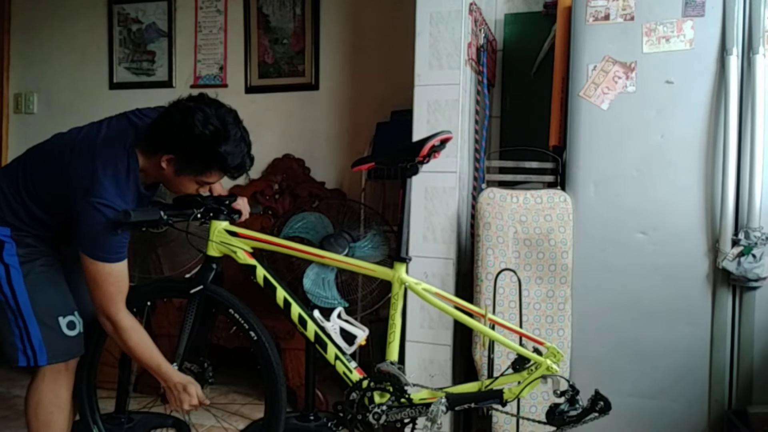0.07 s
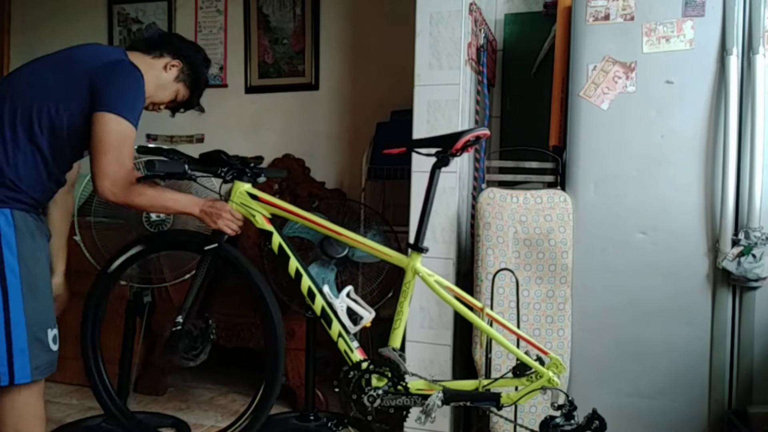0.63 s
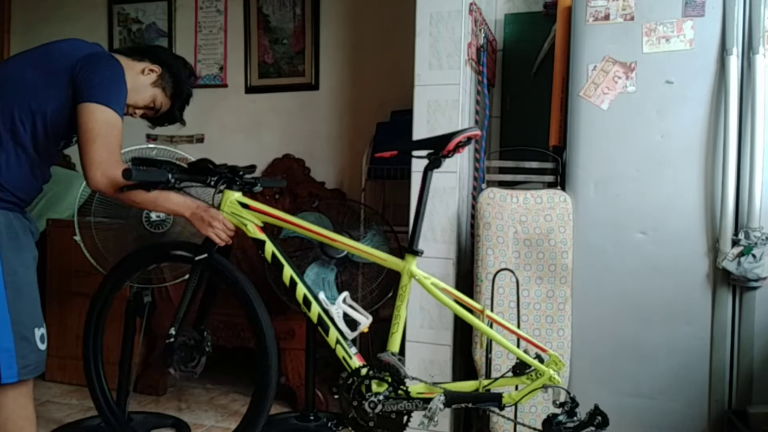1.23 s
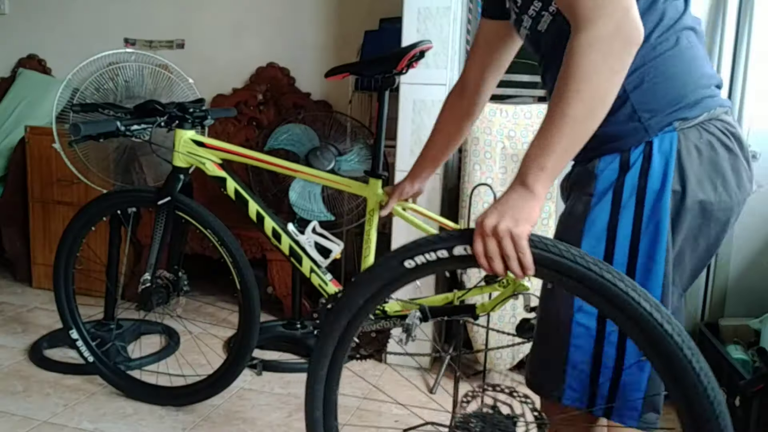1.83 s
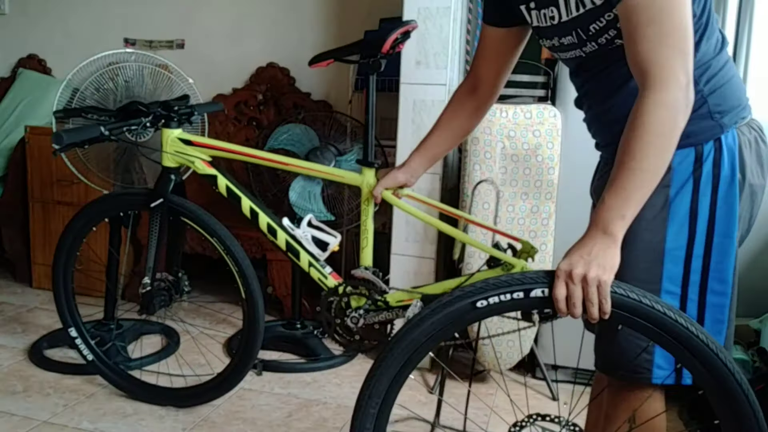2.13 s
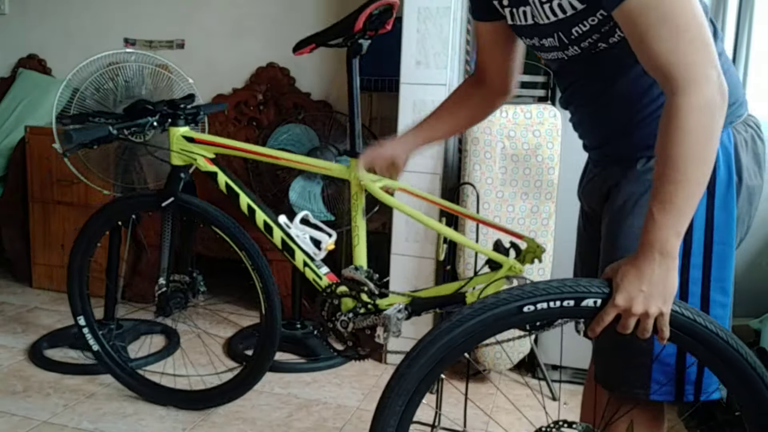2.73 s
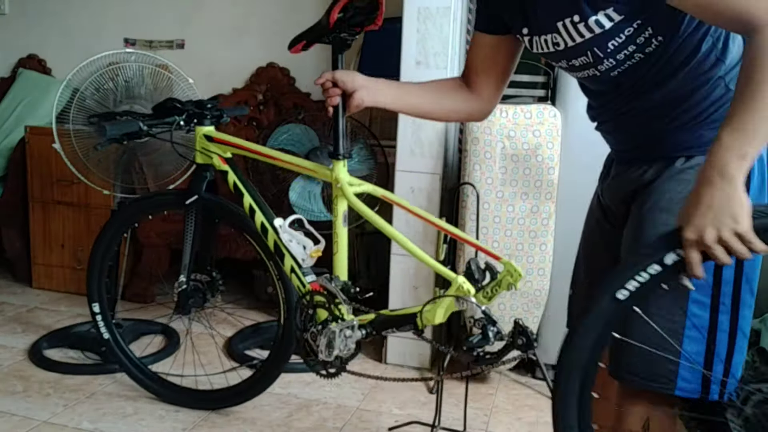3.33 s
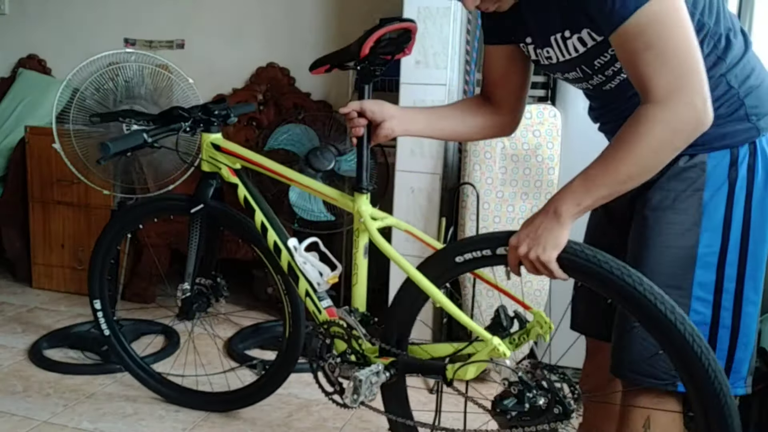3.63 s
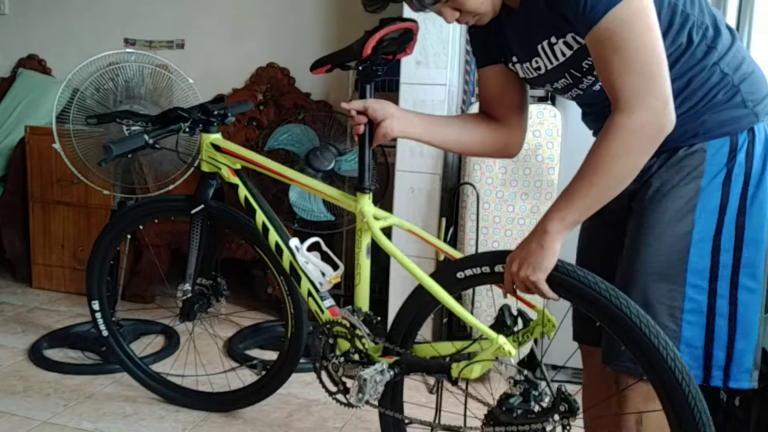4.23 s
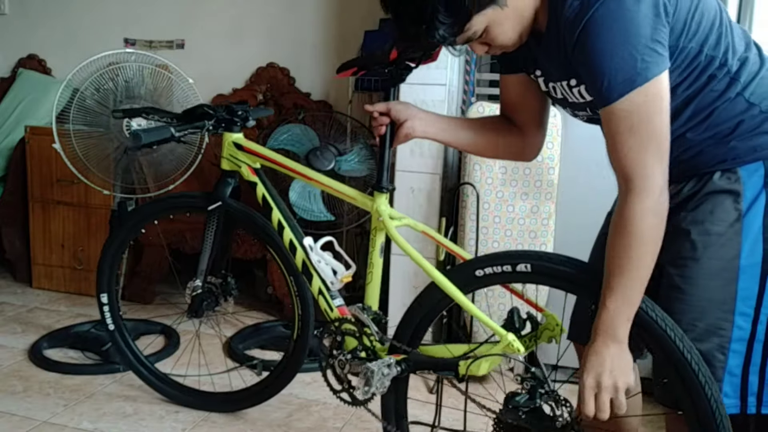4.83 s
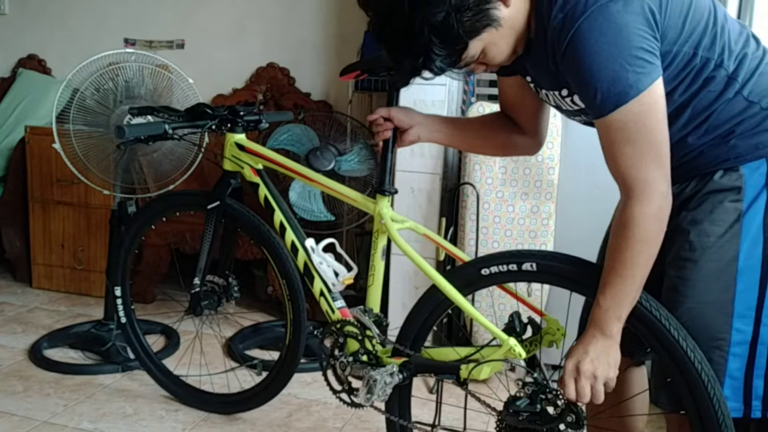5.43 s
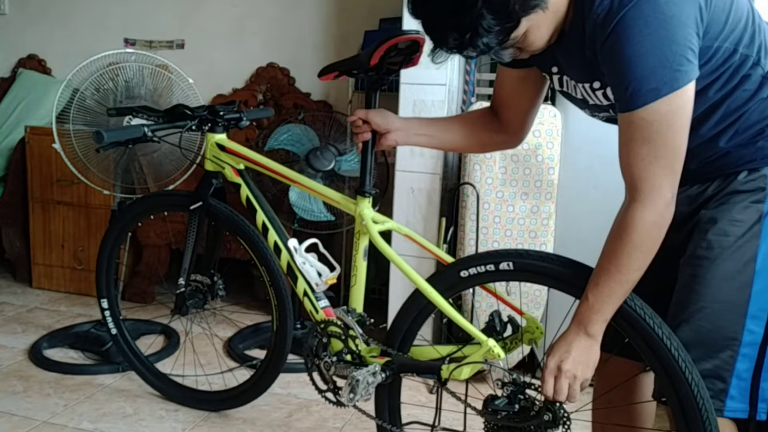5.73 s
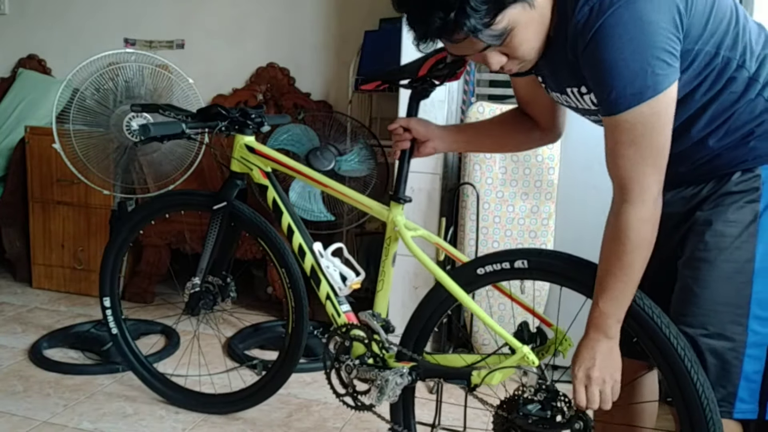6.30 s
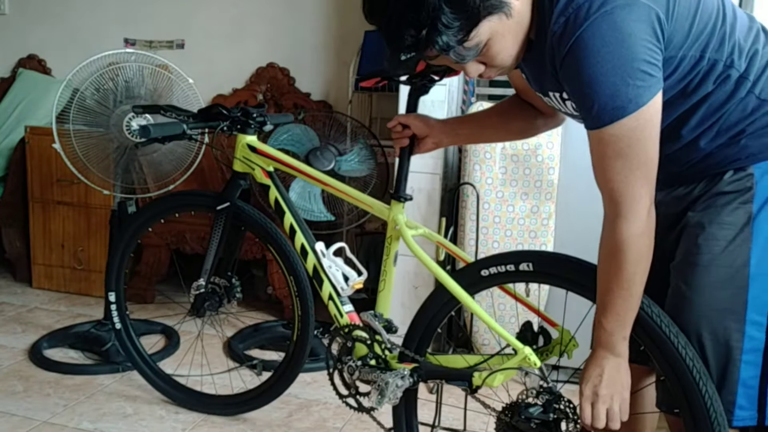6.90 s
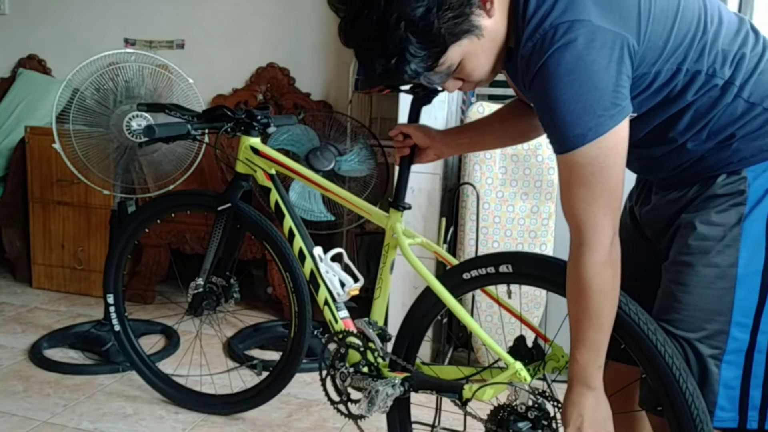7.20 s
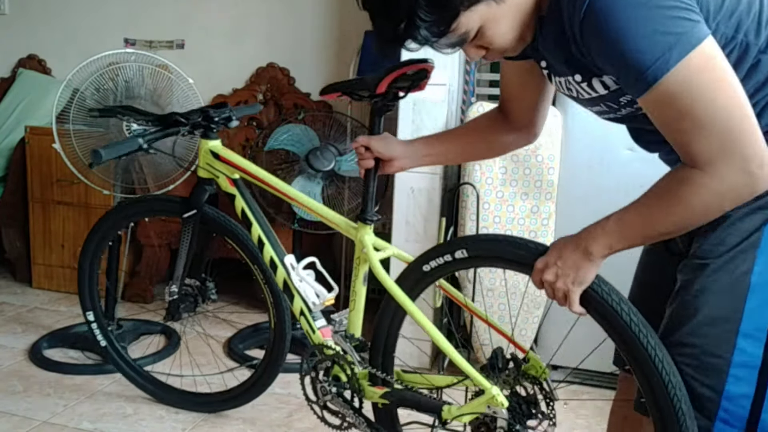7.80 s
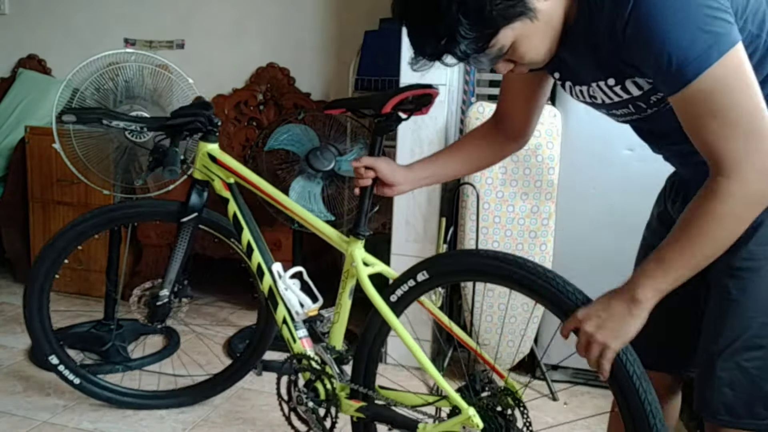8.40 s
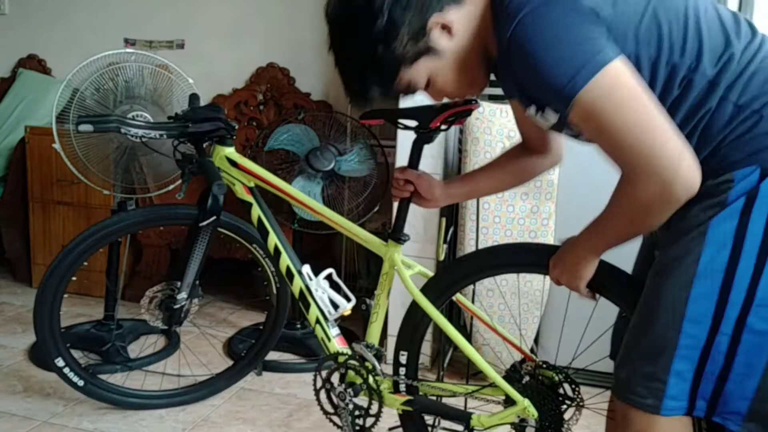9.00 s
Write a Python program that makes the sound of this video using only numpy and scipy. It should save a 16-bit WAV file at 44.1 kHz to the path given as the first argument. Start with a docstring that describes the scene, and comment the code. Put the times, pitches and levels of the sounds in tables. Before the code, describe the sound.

A bicycle is handled nearby in a small room, over a faint steady hiss with soft rustles of hands and clothes. Light taps on the frame and tiny chain ticks fill the first half second, followed by a metal clink at 0.7. A quick cluster of sharp knocks comes at 1.4, and the whole sound dips briefly near 1.7. From about 2.1 to 2.3 the chain and gears clatter loudly against the frame, with low floor bumps. A sharp metallic click at 3.6 trails into small clinks and a faint rattle. Quiet clinks and ticks follow around 4.9 to 5.2. The wheel knocks into the frame at 5.9 and again, with a short ring, at 7.4, amid soft floor bumps. Light clinks, taps and a bright chain tick gather around 8, then a faint chain rattle runs on to about 9.

```python
"""Knocks and a clatter of chain and derailleur: a mountain bike is handled in a small tiled room.
The front wheel is clamped, the frame is lifted and the rear wheel is worked into the dropouts.
Blows ring the frame's modes, chain links tick and rattle, tyre and feet bump on the floor, hands and
clothes rustle. A faint steady hiss lies under it all; the whole sound dips briefly once."""
import sys
import numpy as np
from scipy import signal
from scipy.fft import rfft, irfft
from scipy.io import wavfile

SR = 44100
rng = np.random.default_rng(int(sys.argv[2]) if len(sys.argv) > 2 else 0)


def dump(signal):
    """Clip the signal to [-1, 1] and save it as 16-bit WAV at the path in sys.argv[1]."""
    limited = np.clip(np.atleast_2d(signal).T, -1, 1)
    pcm = np.round(limited * 32767).astype(np.int16)
    wavfile.write(sys.argv[1], SR, pcm)


N = 403515
T = np.arange(SR // 3) / SR  # seconds since a blow


def undb(db):
    """Decibels to gain."""
    return 10 ** (np.asarray(db) / 20)


def unit(x):
    """Scale to rms 1."""
    return x / np.sqrt(np.mean(x ** 2))


def add(out, start_s, x):
    """Mix x in at start_s."""
    i = int(start_s * SR)
    out[i:i + len(x)] += x[:N - i]


def walk(rate_hz, size=N):
    """Random levels joined by straight lines, spread near 1."""
    levels = rng.standard_normal(size // 16)
    return np.interp(np.arange(size) * rate_hz / SR, np.arange(len(levels)), levels)


def fade(t60_s):
    """Free decay after a blow; a t60 of zero or less leaves an impulse."""
    return np.exp(-np.log(1000) * T / max(t60_s, 1 / SR))


def swell(rise_s):
    """Linear rise as parts come into full contact."""
    return np.minimum(T / max(rise_s, 1 / SR), 1)


def ring(hz, t60_s):
    """One struck mode."""
    return np.sqrt(2) * np.sin(2 * np.pi * hz * T) * fade(t60_s)


def db_at(points, hz):
    """Read a spectrum on a log-frequency axis."""
    f, db = np.transpose(points)
    return np.interp(np.log(hz + 1), np.log(f), db)


def hump(f, hz, width_hz):
    """Bell around hz, height 1."""
    return 1 / (1 + (2 * (f - hz) / width_hz) ** 2)


def treble(f, corner_hz=4200):
    """Shelf from 0 to 1 over the range that only hard contacts reach."""
    return 1 - 1 / (1 + (f / corner_hz) ** 4)


def colour(x, db_of_hz, size=2048):
    """Minimum-phase filter of unit energy, shaped by the given dB curve."""
    hz = np.arange(size // 2 + 1) * SR / size
    cepstrum = irfft(np.log(undb(db_of_hz(hz))))
    cepstrum[1:size // 2] *= 2
    cepstrum[size // 2 + 1:] = 0
    response = irfft(np.exp(rfft(cepstrum)))
    return signal.fftconvolve(x, response / np.linalg.norm(response))[:len(x)]


def burst(db_of_hz, t60_s, crack, grit_db):
    """A first crack and a dying chatter of micro-contacts drive a crowd of modes."""
    chatter = rng.standard_normal(len(T)) * undb(grit_db * walk(871, size=len(T)))
    push = unit(chatter) * fade(t60_s)
    push[0] += crack
    body = colour(push, db_of_hz)
    return body * np.linalg.norm(fade(t60_s)) / np.linalg.norm(body)


# Room hiss. Each row: frequency in Hz, relative density in dB.
HISS_SPECTRUM = [(15, -59), (25, -7), (53, -21.5), (96, -7.5), (204, -7.5), (240, -13.5), (359, -6),
                 (410, -7), (666, -3.5), (804, -4), (1490, -4), (2630, -9), (5580, -29), (8810, -31.5),
                 (15500, -40.5)]
# Humps in the hiss. Each row: centre in Hz, width in Hz, height in dB.
HISS_HUMPS = [(682, 42, 3), (7450, 110, 5), (8720, 1420, 11)]


def hiss(swish, level_db=-48, drift_db=1.6, flutter_db=0.33):
    """Steady room hiss that wavers a little; the swish of clothes adds to it."""
    def spectrum(f):
        return db_at(HISS_SPECTRUM, f) + sum(db * hump(f, hz, width) for hz, width, db in HISS_HUMPS)
    air = colour(rng.standard_normal(N), spectrum)
    steady = undb(level_db + drift_db * walk(1.65))
    return air * np.hypot(steady, swish) * undb(flutter_db * walk(14))


# Reaching, gripping, shifting the bike. Each row: start in seconds, length in seconds,
# swish in dB, floor rumble in dB.
MOVES = [(0, 0.48, -46.5, -60.5), (0.272, 0.33, -48, -66), (0.39, 1, -48.5, -58.5),
         (0.51, 0.28, -46.5, -66), (1.124, 0.6, -43.5, -50.5), (1.743, 0.15, -52, -72),
         (1.94, 0.41, -47.5, -58), (4.8, 0.7, -49.5, -67), (5.988, 0.14, -49, -60),
         (6.097, 0.74, -55.5, -81), (6.815, 0.34, -50.5, -57.5), (7.35, 1, -52, -61),
         (7.807, 0.062, -46, -66), (8.03, 0.43, -50, -75), (8.515, 0.51, -52, -70)]


def move_gains(slip_db=-0.5, slip_db_per_s=-10.5):
    """Each move is one arch of swish, slip and weight; brisk ones scrape, long ones mostly swish."""
    swish, slip, weight = np.zeros((3, N))
    for start_s, length_s, db, floor_db in MOVES:
        arch = np.hanning(int(length_s * SR))
        add(swish, start_s, arch * undb(db) ** 2)
        add(slip, start_s, arch * undb(db + slip_db + slip_db_per_s * length_s) ** 2)
        add(weight, start_s, arch * undb(floor_db) ** 2)
    return np.sqrt([swish, slip, weight])


def floor_rumble(weight, hz=115, width_hz=80):
    """Shifting weight and the rocking bike rumble in the floor."""
    low = colour(rng.standard_normal(N), lambda f: 20 * np.log10(hump(f, hz, width_hz) + 1e-5))
    return low * weight * undb(walk(6.6))


# Sliding hands and clothes. Each row: frequency in Hz, relative density in dB.
RUSTLE_SPECTRUM = [(600, 14.5), (2000, 2), (4000, 3), (6300, -16), (8800, 1), (11000, -9), (15500, -33)]


def rustles(slip):
    """Sliding contacts, made of tiny uneven slips."""
    unevenness_db = 5.5 * walk(400) + 4.5 * walk(30)
    slips = unit(rng.standard_normal(N) * undb(unevenness_db))
    return colour(slips * slip, lambda f: db_at(RUSTLE_SPECTRUM, f))


# Soft floor contacts. Each row: start in seconds, relative level in dB, pitch in Hz.
FLOOR_BUMPS = [(1.45, -49, 99), (2.125, -43, 96), (2.254, -46, 122), (2.285, -44, 86.5), (2.802, -53, 89),
               (3.56, -57, 81), (5.775, -49, 70), (6.003, -46.5, 100), (7.001, -52, 105), (7.289, -51, 80),
               (7.441, -47, 105), (7.821, -57, 84)]


def floor_bumps(rise_s=0.0042, t60_s=0.101):
    """Tyre and feet meet the floor softly: a few low cycles."""
    out = np.zeros(N)
    onset = 1 - np.exp(-T / rise_s)
    for start_s, db, hz in FLOOR_BUMPS:
        add(out, start_s, 2 * undb(db) * ring(hz, t60_s) * onset)
    return out


# Lasting frame modes. Each row: frequency in Hz, level in dB, t60 in seconds before damping.
FRAME_MODES = [(370, -26, 0.095), (637, 1, 0.077), (1302, 5.5, 0.074), (1620, 3.5, 0.041), (1927, 0, 0.083),
               (2064, -2.5, 0.14), (2130, -7.5, 0.17), (2380, -16, 0.069), (2630, -20, 0.098),
               (3214, -26, .11), (4355, 1, 0.1), (5080, -16, 0.056), (6300, -32, 0.09), (8300, -28, 0.034),
               (9000, -30, .07)]


def frame_ring(damping_t60_s):
    """The place of the blow, drawn at random, sets how strongly each mode answers."""
    shares = rng.uniform(-1, 1, len(FRAME_MODES))
    modes = sum(share * undb(db) * ring(hz, t60_s) for share, (hz, db, t60_s) in zip(shares, FRAME_MODES))
    return modes * fade(damping_t60_s)


# Crowded modes of frame and wheel. Each row: frequency in Hz, relative density in dB.
FRAME_SPECTRUM = [(30, -39), (130, -39), (300, -37), (470, -8), (800, -6.5), (1250, -6), (1550, -4.5),
                  (2000, 1), (2600, -6.5), (3600, -15), (4500, -19), (6000, -23), (7600, -22.5),
                  (9000, -15.5), (11000, -30), (15500, -46)]


def frame_touch(t60_s, treble_db):
    """A light contact gives a dry rattle of the frame and a faint ring."""
    body = burst(lambda f: db_at(FRAME_SPECTRUM, f) + treble_db * treble(f), t60_s, crack=3.2, grit_db=1)
    return body + undb(-17) * frame_ring(4.1 * t60_s)


# Hands and lever on the frame. Each row: start in seconds, level in dB.
FRAME_TAPS = [(.097, -33.5), (.1305, -36), (.307, -32.5), (.377, -37.5), (0.568, -37.5), (.595, -36.5),
              (1.653, -31.5), (3.167, -40), (4.440, -41.5), (7.830, -44), (8.05, -37.5), (8.566, -45)]


def frame_taps(rise_s=0.0032, t60_s=0.097):
    """Damped touches: the frame answers, nothing pings."""
    out = np.zeros(N)
    for start_s, db in FRAME_TAPS:
        add(out, start_s, undb(db) * swell(rise_s) * frame_touch(t60_s, treble_db=1))
    return out


# Spokes and axle. Each row: start in seconds, level in dB, pitch in Hz, relative ping in dB.
METAL_CLINKS = [(0.69, -28.5, 2420, -1.5), (3.663, -39, 2110, 2), (3.673, -39, 2475, 6.5),
                (3.727, -39.5, 2430, 1), (4.867, -40.5, 2066, 0), (5.034, -38, 2024, 3),
                (5.035, -58, 4300, 7), (5.226, -42, 2200, -8), (6.877, -34, 2540, -7),
                (7.845, -35, 1695, -1), (8.183, -34, 1820, 1)]


def metal_clinks(rise_s=0.0022, t60_s=0.068):
    """Light metal touches: a short ping over a dry rattle of the frame."""
    out = np.zeros(N)
    for start_s, db, hz, ping_db in METAL_CLINKS:
        ping = undb(ping_db) * ring(hz, t60_s)
        add(out, start_s, undb(db) * swell(rise_s) * (frame_touch(t60_s, treble_db=-10) + ping))
    return out


# Crowded modes of small steel parts. Each row: frequency in Hz, relative density in dB.
STEEL_SPECTRUM = [(1000, -6.5), (3000, -14.5), (6200, -16.5), (8400, -1), (10500, -6.5), (13000, -10.5),
                  (15500, -17)]


def steel_snap(top_db, t60_s=0.05):
    """One bright snap between small steel parts; top_db sets how much top octave it has."""
    return burst(lambda f: db_at(STEEL_SPECTRUM, f) + top_db * hump(f, 14000, 5000),
                 t60_s, crack=6.9, grit_db=7)


# Single chain links. Each row: start in seconds, level in dB.
CHAIN_TICKS = [(0.336, -44), (0.375, -42.5), (1.483, -47), (3.168, -47), (3.580, -32.5), (4.864, -50),
               (5.084, -39), (6.023, -43.5), (8.048, -27.5), (8.093, -44)]


def chain_ticks(ping_hz=8670, ping_db=-3.5, spread=0.032, rise_s=0.0016, t60_s=0.05):
    """Links snap onto sprocket teeth, each pinging at nearly the same high pitch."""
    out = np.zeros(N)
    for start_s, db in CHAIN_TICKS:
        hz = ping_hz * (1 + spread * rng.uniform(-0.64, 1))
        ping = undb(ping_db) * ring(hz, t60_s)
        add(out, start_s, undb(db) * swell(rise_s) * (steel_snap(top_db=-1) + ping))
    return out


# Chain sliding over frame and sprockets. Each row: start in seconds, length in seconds, level in dB,
# fall over that length in dB, hits per second, relative steel level in dB.
CHAIN_RATTLES = [(2.214, 0.11, -21, 4.5, 1400, -16), (3.592, 0.24, -53, 10, 200, -6),
                 (4.279, 0.049, -67, -3, 900, 7.5), (6, 0.14, -64.5, 4, 290, 1),
                 (8.197, 0.14, -62, 2, 300, 1.5), (8.498, 0.8, -58.5, 1, 110, -10)]


def chain_rattles(scatter_db=3):
    """Link after link strikes: each hit rings the frame and the steel of the chain."""
    on_frame, on_steel = np.zeros((2, N))
    for start_s, length_s, db, fall_db, hits_per_s, steel_db in CHAIN_RATTLES:
        n = int(length_s * SR)
        struck = rng.random(SR)[:n] < hits_per_s / SR
        polarity = np.sign(rng.standard_normal(SR)[:n])
        hit_db = scatter_db * rng.standard_normal(SR)[:n] - fall_db * np.arange(n) / n
        hits = undb(db) * unit(polarity * struck * undb(hit_db) + 1e-9)
        add(on_frame, start_s, hits)
        add(on_steel, start_s, undb(steel_db) * hits)
    tube = burst(lambda f: db_at(FRAME_SPECTRUM, f) + 6 * hump(f, 3330, 1500),
                 t60_s=0.015, crack=1.7, grit_db=-4)
    # sliding links are duller than snapping ones
    link = burst(lambda f: db_at(STEEL_SPECTRUM, f) - 6 * hump(f, 16500, 7000),
                 t60_s=0.021, crack=13, grit_db=16)
    return sum(signal.fftconvolve(drive, body / np.linalg.norm(body))[:N]
               for drive, body in ((on_frame, tube), (on_steel, link)))


# Struck parts, by name. Each row: thud in Hz, ring in Hz, relative ring in dB,
# chatter t60 in seconds, relative chain jolt in dB.
BIKE_PARTS = {"fork": (487, 2348, 6, 0.07, -36), "rim": (571, 2147, -5, 0.0228, -32),
              "stay": (595, 1882, -1, 0.0661, -36), "chain": (595, 3154, -6, 0.0952, -8.5),
              "cassette": (591, 2690, 3.5, -0.06, -26), "hub": (598, 1450, -4, 0.0153, -14),
              "dropout": (433, 1700, -14, 0.1, -10), "frame": (413, 1528, -11, 0.45, -30),
              "lever": (343, 1220, 1.5, 0.094, -30), "axle": (720, 2027, 5, .056, -14)}
# Heavy blows. Each row: start in seconds, part, level in dB, rise in seconds,
# relative thud in dB, treble shelf in dB.
KNOCKS = [(1.394, "fork", -19.5, 0.00033, -11, -1), (1.3984, "rim", -19, 0.00062, -2, 8),
          (1.42, "fork", -39, .001, -27, -5), (1.433, "rim", -17.5, 0.0029, -14, -7),
          (2.162, "stay", -15, 0.0046, -3.5, -2.5), (2.191, "stay", -13, 0.0046, -10.5, -3),
          (2.215, "chain", -16, .001, -15, 8.5), (2.235, "cassette", -10.5, 0.00029, -14, -7),
          (2.241, "stay", -21, .004, 6.5, -8), (2.251, "chain", -15, 0.0036, -44, 7),
          (2.271, "stay", -16, .0023, -24, 8), (2.302, "stay", -24, .003, -9, 1),
          (2.322, "rim", -22, 0.0011, -12, 2), (3.5784, "hub", -20.5, 0.00017, -16, -14),
          (5.917, "dropout", -15, 0.0051, -23, -7), (5.927, "frame", -31, .0015, 4.5, -12),
          (5.965, "chain", -36, .004, -19, 9), (7.438, "lever", -21.5, 0.0023, -14.5, -5),
          (7.442, "axle", -16, 0.00056, -38, -11), (7.458, "dropout", -25.5, 0.0017, -20, -32)]


def knocks(thud_t60_s=0.04, bass_per_thud=0.81, usual_thud_db=-10, place_spread=0.013):
    """A blow rings part and frame and jolts the chain; weight behind it adds a low, damped thud."""
    out = np.zeros(N)
    for start_s, part, db, rise_s, thud_db, treble_db in KNOCKS:
        thud_hz, ring_hz, ring_db, t60_s, jolt_db = BIKE_PARTS[part]
        bass_db = bass_per_thud * (thud_db - usual_thud_db)  # weight wakes the frame's lower modes

        def spectrum(f):
            return db_at(FRAME_SPECTRUM, f) + bass_db * hump(f, 530, 480) + treble_db * treble(f)
        body = burst(spectrum, t60_s, crack=0.75, grit_db=3.5)
        thud = undb(thud_db) * ring(thud_hz, thud_t60_s)
        hz = ring_hz * (1 + place_spread * rng.uniform(-1, 1))
        part_ring = undb(ring_db) * ring(hz, 0.55 * t60_s)
        frame = undb(-21.5) * frame_ring(5 * t60_s)
        jolt = undb(jolt_db) * steel_snap(top_db=3)
        add(out, start_s, undb(db) * swell(rise_s) * (body + thud + part_ring + frame + jolt))
    return out


def room(x, echoes=12, early_db=-9, tail_db=-18, t60_s=0.29, damp_hz=5000):
    """Floor and near furniture return quick echoes; the walls add a short, duller tail."""
    early = np.zeros(len(T))
    signs = rng.choice([-1, 1], echoes)
    delays_s = rng.uniform(0.003, 0.022, echoes)
    early[(delays_s * SR).astype(int)] = signs
    tail = rng.standard_normal(len(T)) * fade(t60_s) * (1 - fade(0.11))
    tail = signal.lfilter(*signal.butter(1, damp_hz, fs=SR), tail / np.linalg.norm(tail))
    response = undb(early_db) * early / np.linalg.norm(early) + undb(tail_db) * tail
    return x + signal.fftconvolve(x, response)[:N]


def level_dip(at_s=1.685, depth_db=-26.5, fall_s=0.042, rise_s=0.033):
    """Gain that sinks to a sharp low point and comes back."""
    t = np.arange(N) / SR - at_s
    return undb(depth_db * np.exp(-np.abs(t) / np.where(t < 0, fall_s, rise_s)))


def scene():
    """The bike in the room, over floor noise and hiss; mono."""
    swish, slip, weight = move_gains()
    bike = knocks() + frame_taps() + metal_clinks() + chain_ticks() + chain_rattles() + rustles(slip)
    mix = room(bike) + floor_bumps() + floor_rumble(weight) + hiss(swish)
    return (mix * level_dip())[None]


def record(dry, low_cut_hz=32, top_hz=15750):
    """The phone thins the deepest bass and cuts the top."""
    thinned = signal.sosfilt(signal.butter(2, low_cut_hz, "high", fs=SR, output="sos"), dry)
    return signal.sosfilt(signal.ellip(10, 0.2, 80, top_hz, fs=SR, output="sos"), thinned)


dry = scene()
out = record(dry)
dump(out)
```